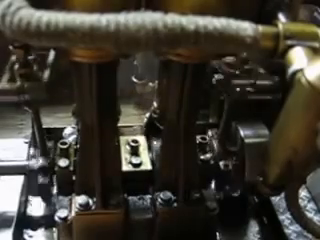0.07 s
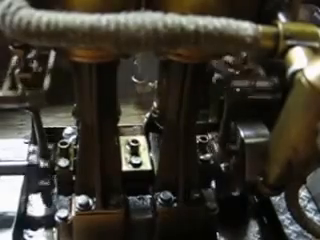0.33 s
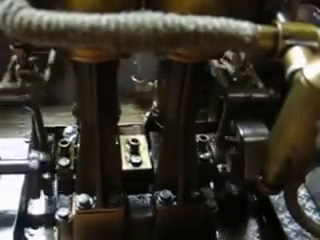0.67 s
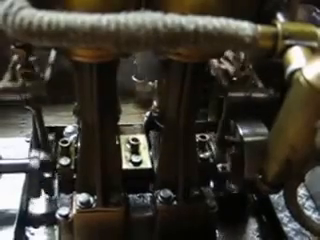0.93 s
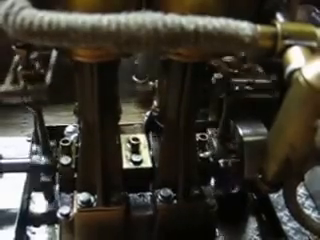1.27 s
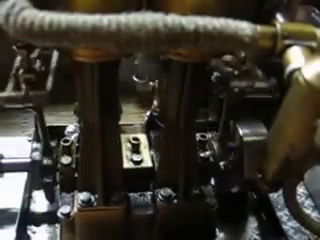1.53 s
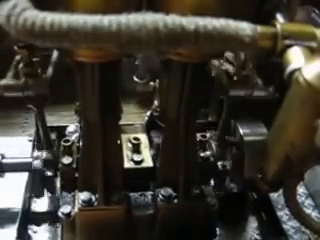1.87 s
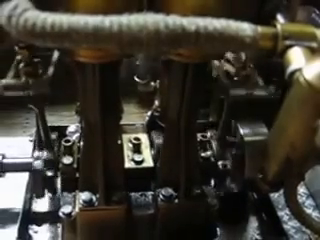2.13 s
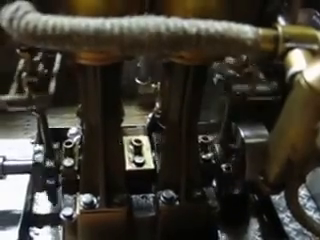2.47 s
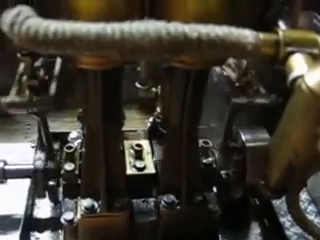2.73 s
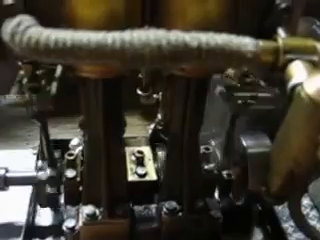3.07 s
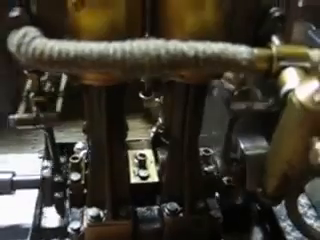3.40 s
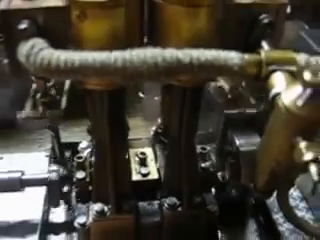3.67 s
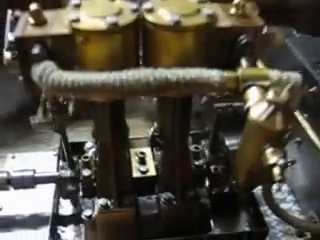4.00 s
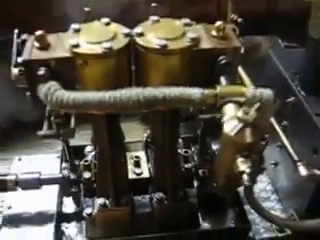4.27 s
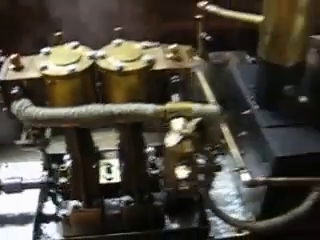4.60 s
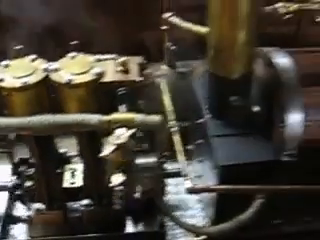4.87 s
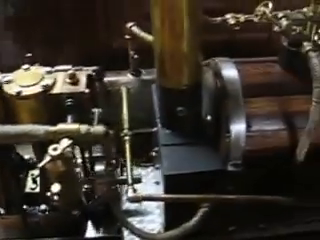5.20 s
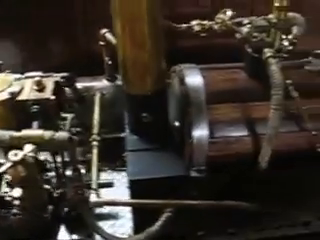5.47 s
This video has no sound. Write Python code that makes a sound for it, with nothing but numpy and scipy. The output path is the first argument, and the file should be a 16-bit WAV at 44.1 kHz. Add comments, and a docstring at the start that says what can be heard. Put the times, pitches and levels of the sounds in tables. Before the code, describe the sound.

A model steam engine runs throughout, heard very close inside a boat hull. A burner gives a low, fluttering roar, steam hisses steadily, and light, hissy chuffs come about eight times a second, alternately stronger and weaker. Beneath them are a fine sizzle and a faint, high whistle from a leak. Hot water spits in small, scattered pops, sharper between 2 and 2.8 seconds. From about 3.6 seconds the leak swells into a wet, spraying sputter, peaking around 4.1 seconds in a cluster of sharp snaps that briefly ducks the other sounds. At 4.2 seconds it blows clear into a dry jet with a breathy, high whistle, which slowly fades and sags in pitch. From 3.5 seconds the microphone draws back and then turns towards the boiler, so the roar and chuffs soften and the hiss changes colour. A brief wet spurt comes at 5.5 seconds.

```python
"""Inside a boat hull, the microphone very close to the cylinders of a model steam plant.
The burner roars in the boiler flue, steam hisses, and the engine chuffs twice a turn.
Hot condensate sizzles and spits. A faintly whistling leak at the gland swells into a wet sputter
that makes the recorder's gain control duck, then blows clear in a dry, whistling jet.
Meanwhile the microphone draws back from the cylinders and turns towards the boiler."""
import sys
import numpy as np
from scipy import signal
from scipy.fft import rfft, irfft, next_fast_len
from scipy.io import wavfile
from scipy.ndimage import uniform_filter1d

SR = 44100
rng = np.random.default_rng(int(sys.argv[2]) if len(sys.argv) > 2 else 0)


def materialize(psi):
    """Save the field psi as 16-bit PCM at rate SR to the path in sys.argv[1].

    A 1-D psi becomes a single channel; in a 2-D psi each row is a channel.
    """
    bounded = np.clip(np.atleast_2d(psi).T, -1, 1)
    quanta = np.round(bounded * 32767).astype(np.int16)
    wavfile.write(sys.argv[1], SR, quanta)


N = 248283
TIME = np.arange(N) / SR


def from_db(db):
    """Decibels to gain."""
    return 10 ** (np.asarray(db) / 20)


def rms_one(x):
    """Scale to unit rms."""
    return x / np.sqrt(np.mean(x ** 2) + 1e-20)


def in_time(rows):
    """A curve of (seconds, value) points, sample by sample."""
    return np.interp(TIME, *np.transpose(rows))


def drift(rate_hz):
    """Random wander of rms 1, mostly slower than `rate_hz`."""
    hz = np.arange(N // 2 + 1) * SR / N
    return rms_one(irfft(rfft(rng.standard_normal(N)) / (1 + (hz / rate_hz) ** 2), N))


def coloured(x, spectrum, resonances=()):
    """Give a white sound a broad spectrum with narrow peaks and dips, keeping its power."""
    size = next_fast_len(N)
    hz = np.maximum(np.arange(size // 2 + 1) * SR / size, 1)
    points, db = np.transpose(spectrum)
    lift = 1
    for centre, width, lift_db in resonances:
        lift = lift + (from_db(lift_db) ** 2 - 1) / (1 + ((hz - centre) / width) ** 2) ** 2
    gain = from_db(np.interp(np.log(hz), np.log(points), db)) * np.sqrt(np.abs(lift))
    return irfft(rfft(x, size) * rms_one(gain), size)[:N]


def resonate(x, hz, width_hz):
    """One resonance with gain 1 at its peak."""
    r = np.exp(-np.pi * width_hz / SR)
    feedback = [1, -2 * r * np.cos(2 * np.pi * hz / SR), r * r]
    return signal.lfilter(np.array([1, 0, -1]) * (1 - r * r) / 2, feedback, x + 1e-18)


def droplets(per_s, spread_db):
    """Tiny drops burst at random as clicks of uneven size; rms 1."""
    sizes = from_db(spread_db * np.minimum(rng.exponential(1, N), np.pi)) * rng.choice([-1, 1], N)
    return rms_one(sizes * (rng.random(N) < per_s / SR))


# The flame's low roar. Each row: frequency in Hz, relative level in dB.
ROAR_SPECTRUM = [(20, -15.5), (45, -12), (70, -8), (130, -2), (240, -1.5), (320, -5), (380, -6.5),
                 (480, -9.5), (550, -16.5), (700, -14.5), (930, -20.5), (1100, -19.5), (1350, -24),
                 (2500, -39.5)]
# Flue and hull resonances, with the microphone by the cylinders and by the boiler.
# Each row: centre in Hz, width in Hz, lift in dB.
HULL_BY_CYLINDERS = [(89, 8.9, 2.5), (134, 14, 4), (201.5, 9.3, 4), (270, 18, 3), (322.7, 26, 5),
                     (485, 40, 5), (602, 18, 4), (735, 33, 8.5), (776.3, 24, 12), (830, 16, -5),
                     (879, 11, 10.5), (1163, 34, 12)]
HULL_BY_BOILER = [(193, 8.9, 3.9), (266, 24, 1.9), (606, 31, 9.3), (700, 27, 8.3), (782, 34, 11.4),
                  (1200, 24, 8.2)]


def burner(boiler_side, flutter_db=1.27):
    """Flame turbulence rings the flue and the hull; different resonances stand out on each side."""
    flame = rng.standard_normal(N) * from_db(flutter_db * drift(22))
    by_cylinders = coloured(flame, ROAR_SPECTRUM, HULL_BY_CYLINDERS)
    by_boiler = coloured(flame, ROAR_SPECTRUM, HULL_BY_BOILER)
    return (1 - boiler_side) * by_cylinders + boiler_side * by_boiler


# Steam all round the microphone. Each row: frequency in Hz, relative level in dB.
HISS_SPECTRUM = [(500, -13), (1000, -5.5), (1300, -3), (1700, -.5), (2200, -1), (2600, -3.5), (2850, -3.5),
                 (3100, 1.5), (4000, 1.5), (4500, -1), (4700, -5), (5100, -8), (5600, -10), (7000, -8)]
# Cavities close to the microphone on each side. Each row: centre in Hz, width in Hz, lift in dB.
CYLINDER_CAVITIES = [(1385, 18, 6), (1493, 22, 8.5), (1577, 34, 4), (1967, 130, 3.5), (2383, 62, 7.5),
                     (2625, 45, 3), (2900, 78, -4.5), (3445, 40, 8.5), (3540, 45, -4.5), (3730, 90, 6),
                     (3860, 35, -5.5), (4320, 110, 3.5)]
BOILER_CAVITIES = [(1537, 110, 9.5), (1940, 140, 5), (2620, 130, 6.5), (3420, 72, 6.5), (3485, 45, -7.5),
                   (4630, 120, 2.5), (5380, 90, -3)]


def steam_hiss(boiler_side, flutter_db=0.62, surge_db=1.13):
    """Wet steam hisses unsteadily, coloured by whichever cavities lie next to the microphone."""
    steam = rng.standard_normal(N) + 0.4 * droplets(per_s=810, spread_db=5.0)
    steam *= from_db(flutter_db * drift(37) + surge_db * drift(29))
    by_cylinders = coloured(steam, HISS_SPECTRUM, CYLINDER_CAVITIES)
    by_boiler = coloured(steam, HISS_SPECTRUM, BOILER_CAVITIES)
    return (1 - boiler_side) * by_cylinders + boiler_side * by_boiler


def sizzle(boiler_side, leak_db, cylinder_db=-36.0, boiler_db=-36.5, flash_db=-24.5, fade_db_per_s=45):
    """Water boils off the hot gland in high ticks, with a dense flash when the leak first surges."""
    def ticks(drops, ring_hz=5450, width_hz=540):
        return rms_one(resonate(resonate(drops, ring_hz, width_hz), ring_hz, width_hz))

    wet_s = TIME - LEAK_SURGES[0][0]
    flash = np.clip(wet_s / SURGE_ATTACK_S, 0, 1) * from_db(flash_db - fade_db_per_s * np.abs(wet_s))
    leak_fed = np.hypot(flash, from_db(leak_db - 17.5))
    idle = from_db(cylinder_db + (boiler_db - cylinder_db) * boiler_side)
    sparse = ticks(droplets(per_s=190, spread_db=-0.7))
    dense = ticks(droplets(per_s=1200, spread_db=1.0))
    return idle * sparse + leak_fed * dense


# The whistle's upper bands on the dry jet. Each row: multiple of the lowest band, relative level in dB.
WHISTLE_BANDS = [(1.218, -6.5), (1.378, -10), (1.55, -17)]
# Short chirps of the whistle. Each row: peak time in seconds, half length in seconds, lift in dB.
WHISTLE_CHIRPS = [(3.576, 0.016, 11), (4.058, 0.0037, 14.5), (4.187, .012, 23), (4.73, 0.0041, 13.5)]
CLEAR_S = 4.2  # the gland blows clear
SEEP_HZ, JET_HZ, SAG_HZ_PER_S = 3666, 3847, 230


def whistle(jet, seep_db=-32, jet_db=-26.5, core_db=-4.0, flutter_db=3.5):
    """The gland whistles breathily: faint as it seeps, higher on the jet, sagging as pressure drops."""
    clear = TIME > CLEAR_S
    hz = np.where(clear, JET_HZ - SAG_HZ_PER_S * (TIME - CLEAR_S), SEEP_HZ)
    phase = 2 * np.pi * np.cumsum(hz) / SR
    chirps = 1 + sum((from_db(db) - 1) * np.exp(-((TIME - s) / half) ** 2)
                     for s, half, db in WHISTLE_CHIRPS)

    def band(multiple, width_hz):
        angle = multiple * phase
        return rms_one(drift(width_hz) * np.cos(angle) + drift(width_hz) * np.sin(angle))

    seep = from_db(seep_db + flutter_db * np.tanh(drift(15))) * chirps * band(1, width_hz=75)
    upper = sum(from_db(db) * band(multiple, width_hz=175) for multiple, db in WHISTLE_BANDS)
    breath = chirps * band(1, width_hz=175)
    core = from_db(core_db) * band(1, width_hz=50)
    return np.where(clear, from_db(jet_db) * jet * (breath + core + upper), seep)


# The engine's pace. Each row: time in seconds, crank speed in turns per second.
CRANK_SPEED = [(0, 4.24), (1.8, 4.24), (2.4, 4.37), (3.5, 4.41), (4.1, 4.34), (4.5, 4.15), (5.63, 4.14)]
# A strong and a weak chuff. Each row: place in the turn from 0 to 1, relative level in dB.
STROKES = [(0, -0.5), (0.519, -3)]
# A chuff from close by. Each row: frequency in Hz, relative level in dB.
CHUFF_SPECTRUM = [(900, -21), (1600, -10.5), (2050, -9), (2420, 3.5), (2800, -11), (3100, -2), (3550, -8),
                  (3900, -6), (4250, 3), (4480, -0.5), (4750, -2), (5200, -11), (5700, -16)]


def chuffs(first_s=0.086, swell_turns=0.22, cut_turns=0.14, flutter_db=1.0):
    """Twice a turn wet steam blows past the piston rod: each puff swells and is cut off by the valve."""
    turns = np.cumsum(in_time(CRANK_SPEED)) / SR
    turns -= np.interp(first_s, TIME, turns)
    opening = 0
    for place, db in STROKES:
        past_peak = (turns - place + 0.5) % 1 - 0.5
        width = np.where(past_peak < 0, swell_turns, cut_turns)
        opening = opening + from_db(db) * np.exp(-(past_peak / width) ** 2)
    steam = rng.standard_normal(N) + 0.7 * droplets(per_s=900, spread_db=5.5)
    return opening * from_db(flutter_db * drift(8)) * rms_one(coloured(steam, CHUFF_SPECTRUM))


def bursts(plugs, spectrum, crack=1.8):
    """Each plug of water bursts with a crack and lets a few milliseconds of steam through."""
    out, t = np.zeros(N), TIME[:SR // 20]
    for start_s, db, decay_s in plugs:
        envelope = np.exp(-t / decay_s)
        puff = rng.standard_normal(len(t)) * envelope + crack * (t == 0)
        puff *= from_db(db) * np.linalg.norm(envelope) / np.linalg.norm(puff)
        start = round(start_s * SR)
        out[start:start + len(t)] += puff[:N - start]
    return coloured(out, spectrum)


# Condensate spitting near the microphone. Each row: start in seconds, level in dB, decay in seconds.
SPITS = [(.236, -17, .004), (.316, -15, 0.0037), (.5576, -18, .005), (.8223, -13, .002),
         (1.4926, -15, 0.0048), (1.9648, -7.5, 0.0054), (2.4213, -1.5, .002), (2.4252, 1, 0.0035),
         (2.4285, 0, .003), (2.6436, 1.5, .003), (2.809, 2, .0032), (2.888, -15, .004),
         (2.9315, -10, 0.0036), (3.1266, -14, 0.0047), (3.265, -11.5, 0.0035), (3.794, -13.5, 0.0033),
         (4.0852, 11.5, 0.0014), (4.1875, -5, 0.0017), (4.372, -16, 0.0037), (4.731, -18, 0.0029)]
# High snaps, most of them while the gland sputters. Each row: start in seconds, level in dB.
SNAPS = [(.327, -16), (0.827, -0.5), (2.8105, -7), (3.7992, 1.5), (4.0545, 0.5), (4.063, 3.5), (4.0662, 12),
         (4.0797, 1), (4.0852, 9.5), (4.0917, 10), (4.0955, 10.5), (4.0991, 13.5), (4.105, 10),
         (4.113, 9.5), (4.1152, 16), (4.1225, 5.5), (4.126, 4), (4.1327, 11), (4.136, 7.5), (4.138, 5),
         (4.1472, 4), (4.154, 1.5), (4.2127, 4), (4.219, 0)]
# A spit's pop and a snap's brighter crack. Each row: frequency in Hz, relative level in dB.
SPIT_SPECTRUM = [(200, -15), (900, -4.5), (1500, -7.5), (1850, -4), (2300, -1), (3200, 2), (3900, 1.5),
                 (4400, -6), (5000, -8), (5500, -15.5), (7000, -24.5)]
SNAP_SPECTRUM = [(300, -6), (1500, -10), (2300, -5), (3500, -3.5), (4600, 0.5), (5600, 3), (6300, -7.5),
                 (10000, -8)]


def spits(faint_per_s=1.2, faint_db=-14, faint_decay_s=0.0033, snap_decay_s=0.00092):
    """Hot condensate bursts in pops and short, high snaps, with faint spits at random in between."""
    faint = [(s, faint_db, faint_decay_s) for s in TIME[rng.random(N) < faint_per_s / SR]]
    snaps = [(s, db, snap_decay_s) for s, db in SNAPS]
    return bursts(snaps, SNAP_SPECTRUM) + bursts(list(SPITS) + faint, SPIT_SPECTRUM)


# Surges of the leaking gland. Each row: start in seconds, end in seconds, level in dB.
LEAK_SURGES = [(3.619, 3.785, -22.5), (3.833, 4.06, -21.5), (4.072, 4.132, -15), (4.131, 4.192, -13),
               (4.204, 4.22, -16), (5.473, 5.517, -25)]
SURGE_ATTACK_S, SURGE_RELEASE_S = 0.0037, 0.006


def leak_level(jet, seep_db=-48, jet_spray_db=-30):
    """Flow through the gland in dB: a seep, the jet, and surges that shut as water plugs them."""
    flow = from_db(seep_db) + from_db(jet_spray_db) * jet
    for start, end, db in LEAK_SURGES:
        opening = (TIME - start) / SURGE_ATTACK_S
        closing = 1 + (end - TIME) / SURGE_RELEASE_S
        flow += from_db(db) * np.clip(np.minimum(opening, closing), 0, 1)
    return 20 * np.log10(flow)


# The leak's fine spray and low splutter, close up. Each row: frequency in Hz, relative level in dB.
SPRAY_SPECTRUM = [(300, -17), (1000, -18.5), (2000, -13.5), (2850, -4.5), (3100, -0.5), (3650, 2),
                  (3900, 1), (4250, 5), (4800, -0.5), (5200, -2), (5550, -4), (6000, -6), (9000, -10)]
SPLUTTER_SPECTRUM = [(100, -2.5), (400, -1.5), (1200, -9), (2300, -6.5), (4000, -20)]


def wet_leak(leak_db, flutter_db=2.0, splutter_db=9.0):
    """Steam and water spray from the gland; the stronger the flow, the more it splutters."""
    spray_gain = from_db(leak_db + flutter_db * drift(120))
    spray = coloured(droplets(per_s=6000, spread_db=0.5), SPRAY_SPECTRUM)
    splutter = coloured(droplets(per_s=2800, spread_db=2.0), SPLUTTER_SPECTRUM)
    return spray_gain * spray + from_db(2 * leak_db + splutter_db) * splutter


def dry_jet(attack_s=0.12, hold_s=0.28, fade_db_per_s=11):
    """Strength from 0 to 1 of the jet that blows once the gland is clear."""
    age = TIME - CLEAR_S
    fade = from_db(-fade_db_per_s * np.maximum(age - attack_s - hold_s, 0))
    return np.clip(age / attack_s, 0, 1) * fade


# The microphone draws back. Each row: time in seconds, relative distance (1 is by the cylinders).
MIC_DISTANCE = [(0, 1.1), (.8, .99), (3.5, 1), (4.3, 1.85), (4.8, 1.75), (5.2, 1.38), (5.63, 1.48)]
# It also turns. Each row: time in seconds, aim from 0 (cylinders) to 1 (boiler).
MIC_AIM = [(0, 0.12), (1.5, 0.06), (4.28, 0), (4.8, 0.94), (5.2, 1)]


def scene(burner_db=-17.5, hiss_db=-22, chuff_db=-23.5):
    """The steam plant at one moving microphone; roar, hiss and chuffs fall off with distance."""
    distance = in_time(MIC_DISTANCE)
    boiler_side = np.clip(in_time(MIC_AIM), 0, 1)
    jet = dry_jet()
    leak_db = leak_level(jet)
    roar = from_db(burner_db) / distance * burner(boiler_side)
    # The hiss comes from all round, so it falls off least.
    hiss = from_db(hiss_db) / distance ** 0.37 * steam_hiss(boiler_side)
    whistling = whistle(jet)
    water = sizzle(boiler_side, leak_db) + wet_leak(leak_db) + spits()
    engine = from_db(chuff_db) / distance ** 0.87 * chuffs()
    return np.array([roar + hiss + whistling + water + engine] * 2)


def gain_control(x, threshold_db=-10.0, release_db_per_s=210, sense_s=0.0045, treble_db=5.5):
    """Loud moments, shrill ones most, duck the gain; it returns more slowly after a long overload."""
    def smoothed(db, lag_s):
        pole = np.exp(-1 / (lag_s * SR))
        return signal.lfilter([1 - pole], [1, -pole], db)

    treble = from_db(treble_db) * signal.sosfilt(signal.butter(2, 5500, "high", fs=SR, output="sos"), x)
    power = uniform_filter1d(x ** 2 + treble ** 2, int(sense_s * SR))
    over_db = np.maximum(10 * np.log10(np.abs(power) + 1e-12) - threshold_db, 0)
    held_db = np.maximum.accumulate(over_db + release_db_per_s * TIME) - release_db_per_s * TIME
    quick_db = smoothed(held_db, lag_s=0.00023)
    lasting_db = 0.7 * smoothed(held_db, lag_s=0.048)
    return x * from_db(-np.maximum(quick_db, lasting_db))


def record(dry, dc_offset=0.046, rolloff_hz=5750, stopband_hz=7550):
    """A small mono recorder: a slight offset, gain control, rounded peaks and no high treble."""
    x = gain_control(dry[0] + dc_offset)
    x = 1.254 * np.tanh(x / 1.335)
    x = signal.sosfilt(signal.butter(12, rolloff_hz, fs=SR, output="sos"), x)
    x = signal.sosfilt(signal.cheby2(16, 60, stopband_hz, fs=SR, output="sos"), x)
    return np.array([x, x])


dry = scene()
out = record(dry)
materialize(out)
```